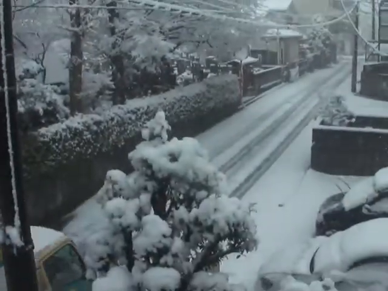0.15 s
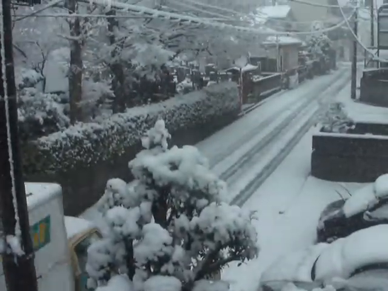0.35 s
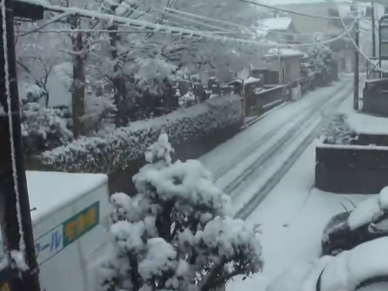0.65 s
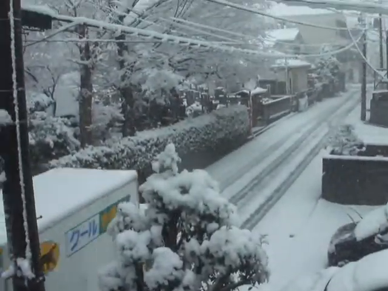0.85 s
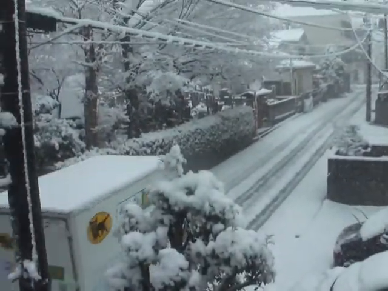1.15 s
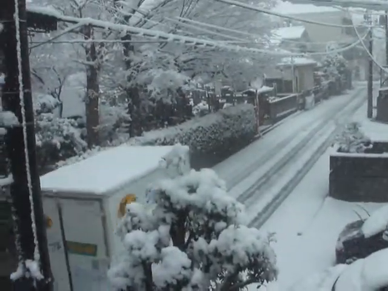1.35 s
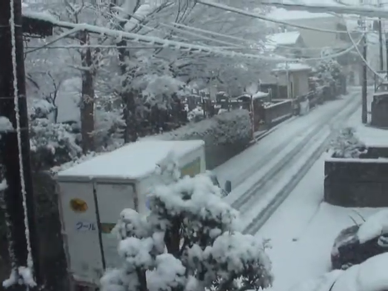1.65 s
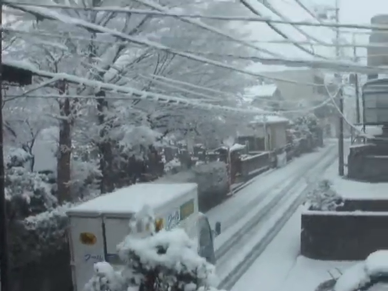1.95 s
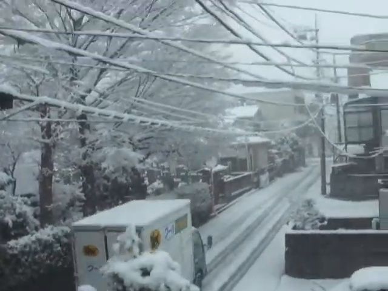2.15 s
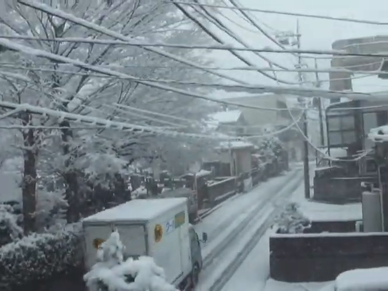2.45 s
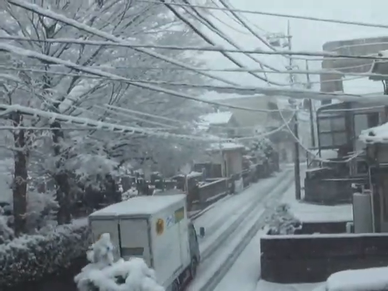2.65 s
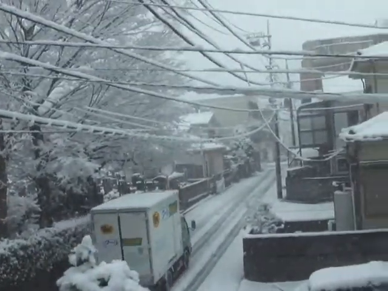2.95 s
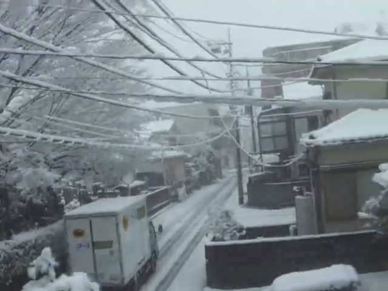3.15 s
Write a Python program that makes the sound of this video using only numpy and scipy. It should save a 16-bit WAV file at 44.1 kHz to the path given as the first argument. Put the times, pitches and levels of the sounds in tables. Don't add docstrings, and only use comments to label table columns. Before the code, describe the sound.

A small diesel truck is near from the start, with uneven engine throb, low hum and exhaust puffs. Tyres crunch snow and thud over ruts, densest before 1.1 s, while chains hiss and jingle brightly. Hard metallic clanks and a snap strike around 0.9-1.05 s. From about 1.5 s the truck recedes, duller and quieter, with snaps near 1.8 and 2.7 s and thuds around 3.04 s, ending at 3.3 s. Thin, right-leaning stereo.

```python
import sys
import numpy as np
from scipy import signal
from scipy.fft import rfft, irfft, next_fast_len
from scipy.io import wavfile
from scipy.ndimage import uniform_filter1d, map_coordinates

SR = 44100
rng = np.random.default_rng(int(sys.argv[2]) if len(sys.argv) > 2 else 0)


def decibels_to_gain(level_db):
    exponent = np.asarray(level_db, float) / 20
    return 10 ** exponent


def wav_record(signal):
    frames = np.transpose(np.atleast_2d(signal))
    bounded = np.clip(frames, -1, 1)
    quanta = np.round(bounded * 32767).astype(np.int16)
    wavfile.write(sys.argv[1], SR, quanta)


N = 145971


def unit(x):
    return x / np.sqrt(np.mean(x ** 2) + 1e-20)


def along(points, hz):
    f, v = np.transpose(points)
    return np.interp(np.log(hz + 1), np.log(f + 1), v)


def curves(rows):
    s, *cols = np.transpose(rows)
    return [np.interp(np.arange(N) / SR, s, c) for c in cols]


def wobble(rate):
    knots = rng.standard_normal(int(N * rate / SR) + 4)
    return map_coordinates(knots, [np.arange(N) * rate / SR])


def filtered(x, response):
    m = next_fast_len(N + SR // 2)
    return irfft(rfft(x, m) * response(np.fft.rfftfreq(m, 1 / SR)), m)[..., :N]


def bell(centre_hz, spread):
    return lambda f: np.exp(-(np.log((f + 1) / centre_hz) / spread) ** 2)


def resonances(table):
    def response(f):
        total = 0
        for k, (c, w, db) in enumerate(table):
            total = total + (-1) ** k * decibels_to_gain(db) * 1j * f * w / (c * c - f * f + 1j * f * w)
        return total * 1j * f / (120 + 1j * f)
    return response


def rush(patchy_db, narrow=False):
    size = 1024 if narrow else 512
    z = signal.stft(rng.standard_normal((2, N)), nperseg=size)[2]
    field = uniform_filter1d(rng.standard_normal(z.shape[1:]), size=2 if narrow else 5, axis=0)
    field = uniform_filter1d(field, size=5, axis=1)
    return unit(signal.istft(z * decibels_to_gain(patchy_db * unit(field)), nperseg=size)[1][:, :N])


def grit(rate, spread_db):
    size = decibels_to_gain(spread_db * np.minimum(rng.exponential(size=(2, N)), 3))
    size = size * rng.choice([-1, 1], size=(2, N))
    return unit(size * (rng.random((2, N)) < rate / SR))


def bursts(rows, rise_s, hold_s, t60, tone_db, noise_db, spread):
    out = np.zeros(N + SR)
    t = np.arange(SR // 8) / SR
    f = np.fft.rfftfreq(len(t), 1 / SR)
    for s, db, hz in rows:
        white = rng.standard_normal(len(t))
        noise = unit(irfft(rfft(white) * bell(hz, spread)(f), len(t)))
        decay_db = 60 * np.maximum(t - hold_s, 0) / t60
        shape = decibels_to_gain(db - decay_db) * (1 - np.exp(-t / rise_s))
        tone = np.sin(2 * np.pi * hz * t)
        out[round(s * SR):][:len(t)] += shape * (decibels_to_gain(tone_db) * tone + decibels_to_gain(noise_db) * noise)
    return out[:N] * np.ones((2, 1))


def microphone_rumble():
    floor_db, floor_hz = -78, 90
    noise = rng.standard_normal(N) + 0.46 * rng.standard_normal((2, N))
    rumble = unit(filtered(noise, lambda f: np.sqrt(f) * np.exp(-f / floor_hz)))
    return decibels_to_gain(floor_db + np.array([[-3], [3]])) * rumble


def chains():
    # (time [s], level [dB])
    rattle = [(0, -40.5), (.12, -45.5), (.3, -45.5), (.5, -42), (.78, -47), (.87, -43.5), (1.0, -39),
              (1.15, -43), (1.45, -43), (1.55, -45), (2.0, -46.5), (2.2, -49), (2.65, -47), (2.75, -47),
              (2.92, -45), (3.03, -47), (3.15, -46), (3.31, -43)]
    # (frequency [Hz], density [dB per Hz])
    hiss_spectrum = [(2000, -42), (3500, -12.5), (6000, 10), (8000, 8), (9800, 5), (10900, -2),
                     (11450, -0.5)]
    # (time [s], level [dB])
    ringing = [(0, -10), (.08, -5), (.82, -6.5), (.9, -3), (2.1, -1), (2.5, -2), (3.31, -1)]
    # (time [s], peak level [dB], pitch [Hz])
    clinks = [(0.0314, -18, 10700), (0.4894, -28, 9530), (0.902, -24, 9720), (0.942, -23, 10840),
              (0.9644, -28, 10600), (1.0194, -35, 11100), (1.26, -32, 10600), (1.4037, -29, 9700),
              (1.4282, -29, 10800), (1.6072, -25.5, 10700), (1.736, -30, 10680), (1.9001, -29, 10920),
              (2.0787, -37, 10700), (2.2, -37, 10600), (2.29, -38, 10800), (2.37, -33, 10800),
              (2.5117, -36, 10800), (2.6658, -43, 10700), (2.8469, -34, 10600), (2.9033, -37, 10600),
              (3.044, -34, 10500), (1.97, -34, 10500), (1.44, -29, 10750), (2.7197, -26, 10200),
              (2.7994, -32, 10580), (3.243, -20.5, 10570)]
    # (time [s], peak level [dB], pitch [Hz])
    clanks = [
        (.033, -25, 7680),
        (.033, -39, 8700),
        (.897, -16.5, 7700),
        (.905, -20, 7310),
        (1.036, -23, 6250),
        (1.396, -40, 7800),
        (1.863, -31, 7760),
    ]
    # (time [s], peak level [dB])
    snap_times = [
        (.741, -41),
        (0.786, -31),
        (.838, -39),
        (1.0425, -20),
        (1.786, -27.5),
        (2.7194, -27.5),
        (3.05, -29),
    ]
    # (time [s], peak level [dB], centre [Hz])
    spray = [
        (.03, -24, 8400),
        (.085, -33, 7000),
        (3.0, -35.5, 6960),
        (3.26, -37, 6500),
    ]
    ring_hz, ring_width_hz, ring_db = 10700, 530, -7

    rattle_db, = curves(rattle)
    pulse = decibels_to_gain(0.89 * wobble(15) + 1.4 * wobble(40.7))
    friction = pulse * rush(patchy_db=0.5) + 0.59 * grit(400, spread_db=3)
    hiss = unit(filtered(friction, lambda f: decibels_to_gain(along(hiss_spectrum, f))))
    struck = pulse * decibels_to_gain(2.0 * wobble(35.22)) * rush(patchy_db=3)
    jingle = unit(filtered(struck, lambda f: np.exp(-((f - ring_hz) / ring_width_hz) ** 2)))
    jingle = decibels_to_gain(ring_db + curves(ringing)[0]) * jingle

    snaps = bursts([(s, db, 8000) for s, db in snap_times], .0001, 0.0005, 0.0082, -40, -1.2, 0.54)
    splashes = bursts(spray, 0.0069, 0.013, 0.029, -40, -1.7, 0.53)
    rings = bursts(clinks, 0.0029, 0.0057, 0.066, -14.5, -9.5, 0.028)
    rings = rings + bursts(clanks, 0.0067, 0.0071, 0.02, -3.7, -14, 0.022)
    return decibels_to_gain(rattle_db + 3.0) * (hiss + jingle) + snaps + splashes + rings


def tyres(near_db):
    # (frequency [Hz], density [dB per Hz])
    snow = [(30, -60), (90, -11.5), (180, -0.5), (400, 3.5), (900, -5.5), (2000, 2.5), (3500, -19.5),
            (6000, -29)]
    # (time [s], peak level [dB], centre [Hz])
    thuds = [(.066, -16, 470), (.087, -9.5, 950), (.088, -13, 697), (.089, -17.5, 520), (.128, -15, 700),
             (.168, -15, 560), (.375, -16, 466), (.455, -16, 443), (.51, -20, 734), (.59, -24, 750),
             (.63, -21, 654), (.696, -14.5, 700), (.745, -21, 770), (.823, -15, 528), (.862, -13.5, 558),
             (.975, -20, 780), (1.014, -23, 800), (1.431, -13.5, 797), (1.449, -16, 600), (1.482, -16, 800),
             (1.553, -29, 545), (1.783, -24, 554), (2.132, -20.5, 550), (2.2, -22.5, 628),
             (2.277, -20, 510), (2.535, -18, 616), (3.039, -15, 395), (3.04, -16.5, 624), (3.041, -14, 923),
             (3.113, -21.5, 1280)]
    level_db, fade = -5, 0.95
    dulls, dull_hz = 0.59, 1510

    off_db = near_db - near_db.mean()
    grains = decibels_to_gain(0.18 * wobble(8.4)) * rush(patchy_db=2.0, narrow=True) + 0.42 * grit(900, spread_db=2)
    crush = unit(filtered(grains, lambda f: decibels_to_gain(along(snow, f))))
    bright = filtered(crush, lambda f: 1 / (1 + (dull_hz / (f + 1)) ** 4))
    crush = crush + (decibels_to_gain(dulls * off_db) - 1) * bright
    ruts = bursts(thuds, 0.0004, 0.005, 0.03, -7.5, -10.5, 0.36)
    return decibels_to_gain(near_db.mean() + level_db + fade * off_db) * crush + ruts


def engine(near_db):
    # (time [s], firing rate [Hz], level [dB])
    shaft = [(0.0, 50.4, -61), (0.1, 50.09, -54), (2.22, 53.85, -57.5), (2.33, 50.4, -64),
             (3.16, 55.26, -68), (3.31, 50.7, -91)]
    # (frequency [Hz], width [Hz], level [dB])
    body = [(293, 61, -1), (348.5, 38.3, 4), (402, 46, 0), (464.5, 38, 2), (549, 76, 0.5), (631, 75, -1),
            (773, 136, -3.5), (1333, 128, -2.5), (1700, 300, -15.5)]
    # (time [s], level [dB])
    side_on = [(0, 3), (.25, 2), (.7, 3), (1.0, 3), (1.3, 0), (1.6, -1), (2.4, -1), (2.7, -0.5), (3.31, -4)]
    # (frequency [Hz], width [Hz], level [dB])
    pipe_modes = [(80, 16, -20), (161.6, 43, -7.5), (197, 26.3, -2), (270.4, 32, -2.5), (516, 24, -10.5),
                  (1012, 194, -12)]
    # (time [s], level [dB])
    facing = [(0, 0.5), (.6, -4.5), (1.0, -2), (1.7, -4.5), (2.15, 0), (2.6, 0), (2.9, 1.5), (3.31, 2.5)]
    # (frequency [Hz], level [dB])
    pipe_tones = [(200, -10.5), (272, -5.5)]
    # (time [s], peak level [dB], pitch [Hz])
    puffs = [(.052, -31, 328), (.09, -25.5, 189), (.15, -25, 179), (.53, -26, 198), (.88, -27.5, 200),
             (.97, -23, 172), (.164, -14, 305), (.244, -13, 305), (.28, -24, 342), (.5, -23, 336),
             (1.376, -20, 327), (1.43, -18, 350), (1.53, -22, 352), (1.819, -24.5, 220),
             (1.989, -24.5, 268), (2.045, -20, 309), (2.143, -23, 222), (2.199, -17, 290), (2.23, -23, 268),
             (2.274, -17, 259), (2.43, -22, 252), (2.495, -18.5, 279), (2.542, -26, 186), (2.715, -21, 269),
             (2.792, -25, 203), (2.85, -26, 285), (2.883, -27, 275), (3.014, -24, 246), (3.11, -25, 270),
             (3.159, -20, 232), (3.25, -29, 275), (3.295, -27, 265)]
    # (multiple, level over the hum [dB])
    orders = [(1, -1), (2, -2), (3, 6), (4, 6)]
    level_db, fade = -2, 0.77
    side_hz, pipe_db = 700, -34.5

    hz, hum_db = curves(shaft)
    off_db = near_db - near_db.mean()
    turn = np.cumsum(hz * (1 + 0.0083 * wobble(5.82))) / SR
    gate_db = 1.4 * np.cos(2 * np.pi * turn) + 1.3 * np.cos(np.pi * turn + 1.3)
    gate_db = gate_db + 0.67 * np.cos(np.pi / 2 * turn) + 0.87 * wobble(13)
    gate = decibels_to_gain(gate_db)

    throb = unit(filtered(gate * rush(patchy_db=2.0, narrow=True), resonances(body)))
    throb = throb + (decibels_to_gain(curves(side_on)[0]) - 1) * filtered(throb, bell(side_hz, 0.26))
    throb = decibels_to_gain(near_db.mean() + level_db + fade * off_db) * throb

    blast = gate * decibels_to_gain(0.89 * wobble(11.16)) * rush(patchy_db=0.5)
    exhaust = unit(filtered(blast, resonances(pipe_modes)))
    notes = np.zeros(N)
    for note_hz, db in pipe_tones:
        phase = 2 * np.pi * np.cumsum(note_hz * (1 + 0.0181 * wobble(9))) / SR
        notes += decibels_to_gain(db + 0.88 * wobble(18)) * np.sin(phase)
    pipe = decibels_to_gain(pipe_db + curves(facing)[0]) * (exhaust + [gate * notes, 0 * notes])
    pipe = pipe + bursts(puffs, 0.0037, .012, .06, -6, -12, .2)

    hum = np.zeros(N)
    for k, db in orders:
        hum += decibels_to_gain(db + 1.84 * k * wobble(6.54)) * np.sin(2 * np.pi * k * turn)
    hum = decibels_to_gain(hum_db) * hum
    return throb + pipe + [hum, 0 * hum]


def scene():
    # (time [s], nearness [dB])
    nearness = [(0, -23), (.12, -23.5), (.3, -24), (.7, -25), (1.0, -24.5), (1.45, -24.5), (1.8, -26.5),
                (2.1, -28), (2.6, -30.5), (2.9, -31), (3.31, -33)]
    # (frequency [Hz], coherence [0 to 1])
    alike = [(60, 0.91), (170, 1), (490, 0.96), (1380, 1), (3930, 0.87), (8000, 0.75), (11000, 0.54),
             (11500, 0.97)]
    # (frequency [Hz], level [dB])
    lean = [(60, -7.5), (170, -7.5), (490, -6), (1380, -6), (3930, -2), (11200, -7)]
    lead_s = 2.6e-5

    near_db, = curves(nearness)
    direct, scattered = chains() + tyres(near_db) + engine(near_db)
    sign = np.array([[1], [-1]])

    def angle(f):
        return np.arccos(np.clip(along(alike, f), -1, 1)) / 2

    def ports(f):
        return decibels_to_gain(along(lean, f) / 2 * sign) * np.exp(1j * np.pi * f * lead_s * sign)

    mid = filtered(direct, lambda f: np.cos(angle(f)))
    side = filtered(np.roll(scattered, shift=160, axis=0), lambda f: np.sin(angle(f)))
    return filtered(np.array([mid + side, mid - side]), ports)


def camera_response(f):
    notch_hz = [2975, 3040, 4000, 4015, 5010, 5030]
    notch_width_hz = [470, 520, 600, 517, 487, 383]
    notch_db = [-16, -15, -22, -16, -16, -11]
    bass_hz, top_hz, edge_hz, edge_db_per_hz = 57.3, 11750, 11450, .055

    response = decibels_to_gain(-edge_db_per_hz * np.maximum(f - edge_hz, 0)) * (f < top_hz)
    response = response * (1j * f / (bass_hz + 1j * f)) ** 2
    for c, w, db in zip(notch_hz, notch_width_hz, notch_db):
        response = response * (c * c - f * f + 1j * f * w * decibels_to_gain(db)) / (c * c - f * f + 1j * f * w)
    return response


def weak_treble_gate(x):
    weak_db, waver_db, follows = -84, 4, .6
    hz, _, z = signal.stft(x, SR, nperseg=2048)
    power = uniform_filter1d(np.mean(abs(z) ** 2, axis=0), size=4, axis=0)
    waver = rng.standard_normal((len(hz) // 8 + 1, z.shape[2]))
    limit_db = weak_db + waver_db * np.repeat(waver, 8, axis=0)[:len(hz)]
    loud_db = 10 * np.log10(uniform_filter1d(power.mean(axis=0), size=9))
    limit_db = limit_db + follows * (loud_db - loud_db.mean())
    kept = (power > decibels_to_gain(2 * limit_db)) | (hz[:, None] < 2000)
    return signal.istft(z * kept, SR, nperseg=2048)[1][:, :N]


def roll_off(x):
    return signal.sosfilt(signal.butter(12, 11780, fs=SR, output="sos"), x)


def record(dry):
    heard = filtered(dry, camera_response) + microphone_rumble()
    mix = weak_treble_gate(heard)
    return roll_off(mix)


dry = scene()
out = record(dry)
wav_record(out)
```